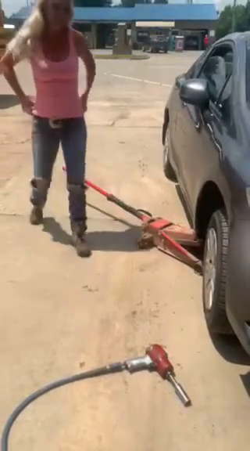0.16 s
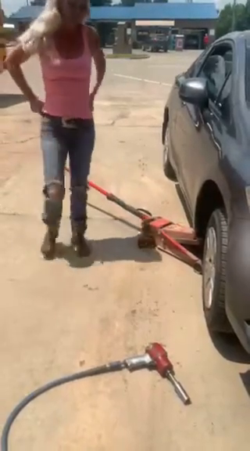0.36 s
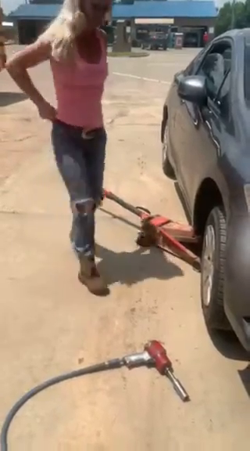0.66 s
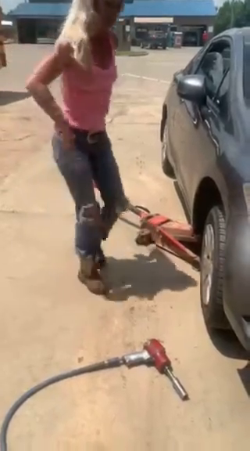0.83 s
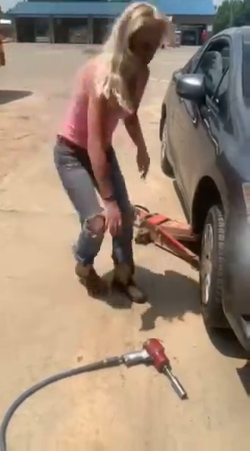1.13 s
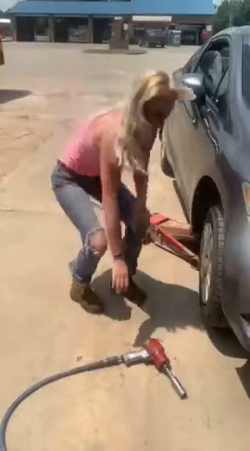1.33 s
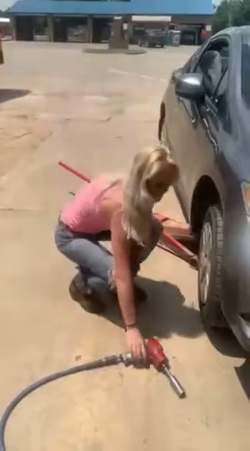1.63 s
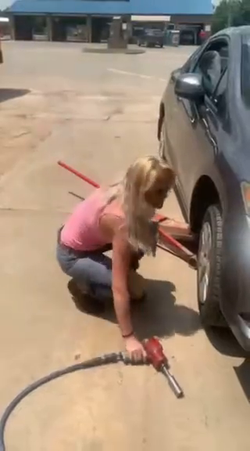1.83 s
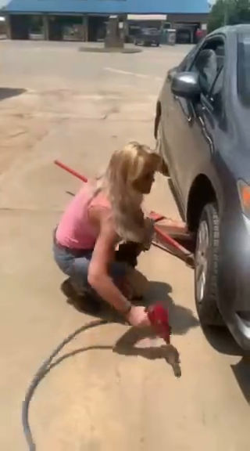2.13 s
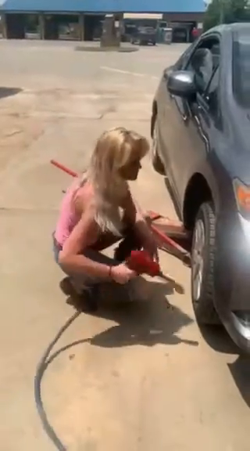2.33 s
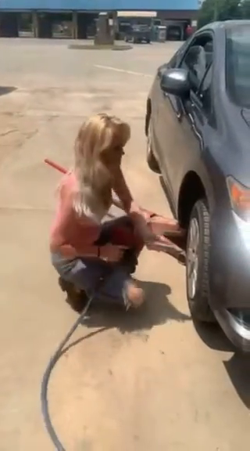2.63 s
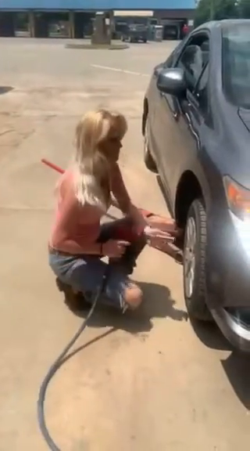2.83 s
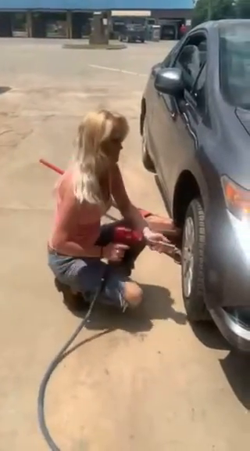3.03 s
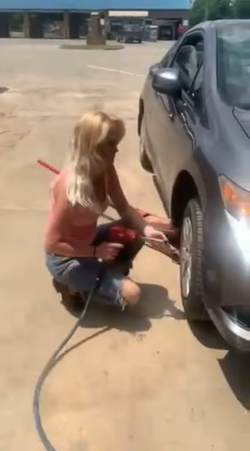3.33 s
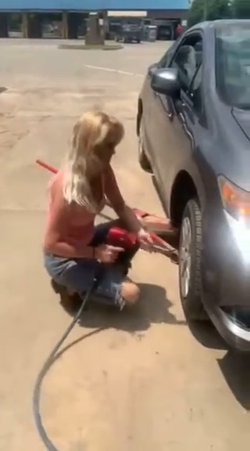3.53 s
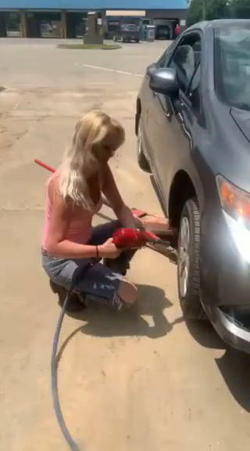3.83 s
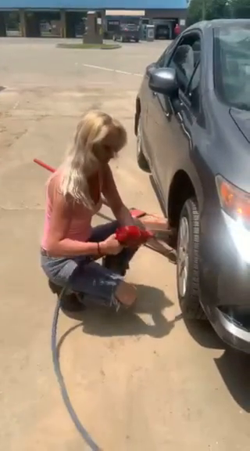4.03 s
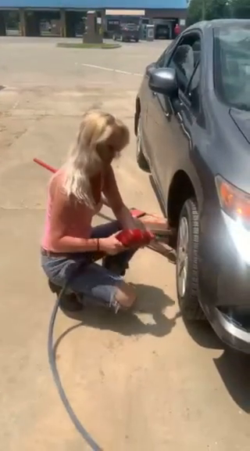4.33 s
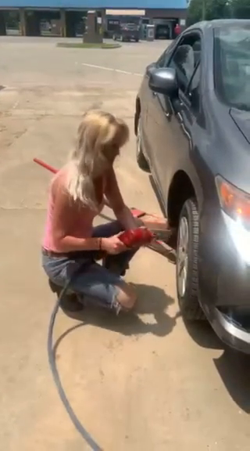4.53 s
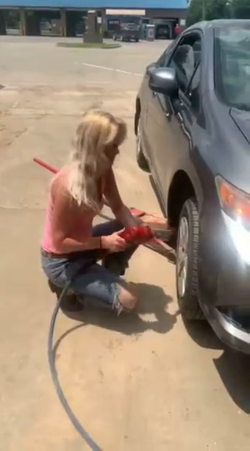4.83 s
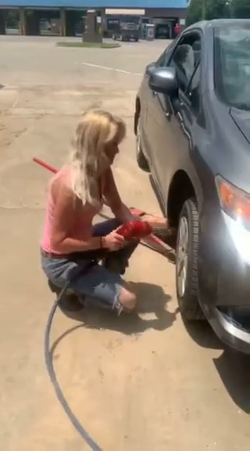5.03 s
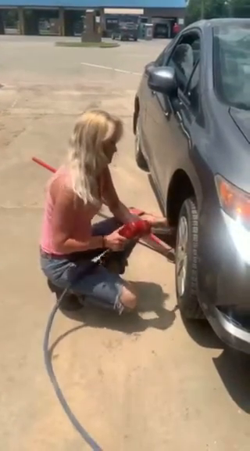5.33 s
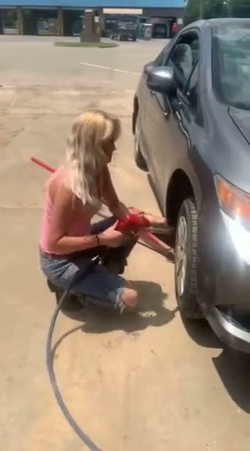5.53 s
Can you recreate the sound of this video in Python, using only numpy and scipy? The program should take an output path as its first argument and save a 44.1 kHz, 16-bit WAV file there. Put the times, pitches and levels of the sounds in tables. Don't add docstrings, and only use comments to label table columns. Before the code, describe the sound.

A low hum and distant rumble continue throughout. First come a footstep and gritty scuffs, then a scraping drag and sharp clack as a metal tool leaves the concrete. After a dull knock, a pneumatic wrench rattles up briefly with puffing exhaust and sharp air hiss, then coasts down. Faint settling sounds remain. Open lot with building echoes; an outdoor microphone whose level ducks under the loud burst.

```python
import sys
import numpy as np
from scipy import signal
from scipy.fft import rfft, irfft, next_fast_len
from scipy.io import wavfile

SR = 44100
rng = np.random.default_rng(int(sys.argv[2]) if len(sys.argv) > 2 else 0)


def master(y):
    cut = np.clip(np.atleast_2d(y).T, -1, 1)
    pcm = np.round(cut * 32767)
    wavfile.write(sys.argv[1], SR, pcm.astype(np.int16))


def volts_from_decibels(level):
    exponent = np.asarray(level, float) / 20
    return 10 ** exponent


N = 250038
SIZE = next_fast_len(N + SR)
HZ = np.maximum(np.arange(SIZE // 2 + 1) * SR / SIZE, 1)
T = np.arange(N) / SR


def in_time(rows):
    s, *columns = np.transpose(rows)
    return [np.interp(T, s, c) for c in columns]


def on_hz(points, axis=1):
    points = np.array(points)
    return np.interp(np.log(HZ), np.log(points[:, 0]), points[:, axis])


def rms_one(x):
    return x / np.sqrt(np.mean(x ** 2) + 1e-20)


def colour(x, spectrum):
    return rms_one(irfft(rfft(x, SIZE) * volts_from_decibels(on_hz(spectrum)), SIZE)[..., :N])


def white_pair():
    return rng.standard_normal((2, N))


def drift(rate_hz):
    knots = rng.standard_normal(int(N / SR * 60) + 2)
    return np.interp(T * rate_hz, np.arange(len(knots)), knots)


def resonate(x, hz, width_hz):
    r = np.exp(-np.pi * width_hz / SR)
    top = np.array([1, 0, -1]) * (1 - r * r) / 2
    return signal.lfilter(top, [1, -2 * r * np.cos(2 * np.pi * hz / SR), r * r], x, axis=-1)


def butter(x, order, hz, kind):
    return signal.sosfilt(signal.butter(order, hz, kind, fs=SR, output="sos"), x)


def band(x, low_hz, high_hz):
    return butter(x, 2, [low_hz, high_hz], "band")


# frequency in Hz, level in dB per Hz.
RUMBLE = [(15, -52.5), (28, -30.5), (50, -7), (70, -0.5), (100, -3.5), (150, -3), (220, -9.5), (300, -10),
          (380, -21), (520, -12), (640, -34), (900, -59.5)]
# frequency in Hz, level in dB per Hz.
TRAFFIC = [(300, 1.5), (600, -2.5), (1000, -1), (1600, -5), (2300, -5.5), (3200, -15.5), (5000, -10),
           (9000, -52.5), (12000, -60)]
# frequency in Hz, level in dB per Hz.
HISS = [(1500, -5.5), (3000, 6.5), (5000, 5), (8000, -2.5), (10500, -1.5), (11600, -10.5), (13500, -29)]
# time in seconds, level in dB.
LEAK = [(0, -57.5), (1.5, -61), (2.4, -60), (3.75, -58), (4.06, -60), (4.37, -70.5), (4.8, -76),
        (4.95, -71), (5.1, -72.5), (5.2, -87.5), (5.3, -74), (5.4, -73.5), (5.55, -71.5), (5.67, -62.5)]


def far_noise():
    thinned = np.clip((T - 4.245) / 0.46, 0, 1)
    traffic_db = -47 - 2.5 * thinned
    leak_db, = in_time(LEAK)
    rumble = colour(white_pair(), RUMBLE) * volts_from_decibels(-43 + 1.3 * drift(11))
    traffic = colour(white_pair(), TRAFFIC) * volts_from_decibels(traffic_db + 1.1 * drift(25))
    hiss = colour(white_pair(), HISS) * volts_from_decibels(leak_db + 9 + 1.5 * drift(40))
    return rumble + traffic + hiss


# tone in Hz, level in dB rms, waver in dB.
HUM = [(71.5, -50, 2), (120.5, -36.5, -0.02), (144, -50.5, 0), (180, -50.5, 2.5)]


def hum():
    whine_hz, whine_width_hz, whine_db = 425.5, 10, -51.5
    breath = resonate(rng.standard_normal(N), whine_hz, whine_width_hz)
    out = volts_from_decibels(whine_db) * rms_one(resonate(breath, whine_hz, 2 * whine_width_hz))
    for hz, db, waver_db in HUM:
        level = np.sqrt(2) * volts_from_decibels(db + waver_db * drift(10))
        phase = 1.12 * waver_db * drift(8.2) + 6 * rng.random()
        out = out + level * np.sin(2 * np.pi * hz * T + phase)
    return out


# delay in seconds, level in dB.
ECHOES = [(.009, -12), (.022, -24), (.074, -17.5), (.135, -27.5)]


def lot(x):
    tail_db, t60_s, cut_hz = -50, 0.97, 2100
    t = np.arange(SR) / SR
    tail = rng.standard_normal((2, SR)) * volts_from_decibels(tail_db - 60 * t / t60_s) * np.clip((t - .03) / 0.2, 0, 1)
    for delay_s, db in ECHOES:
        tail[:, round(delay_s * SR)] += volts_from_decibels(db)
    dull = 1 / (1 + 1j * HZ / cut_hz) / (1 + 300 / (1j * HZ)) ** 2
    return irfft(rfft(x, SIZE) * rfft(tail, SIZE) * dull, SIZE)[:, :N]


def shuffle():
    at_s, length_s, level_db = 3.54, 0.11, -45
    swell = np.exp(-.5 * ((T - at_s) / length_s) ** 2)
    return volts_from_decibels(level_db + 3.6 * drift(40)) * swell * rms_one(band(rng.standard_normal(N), 150, 420))


# start in seconds, hardest contact in seconds, end in seconds, level in dB, brightness in dB.
DRAGS = [
    (0.542, 0.565, 0.58, -55.5, 16),
    (1.243, 1.262, 1.275, -45, 3),
    (1.424, 1.444, 1.44, -43, -8),
    (1.864, 2.017, 2.16, -37.5, -2),
    (2.051, 2.049, 2.034, -19.5, 1.5),
    (2.285, 2.32, 2.7, -52, 9),
    (2.37, 2.392, 2.4, -36, -13.5),
    (3.927, 4.02, 2.9, -62, -13),
]


def drags(per_s=900):
    edge_db = -18
    size = volts_from_decibels(3.2 * np.minimum(rng.exponential(1, N), 4)) * rng.choice([-1, 1], N)
    grit = (rng.random(N) < per_s / SR) * size
    grit = rms_one(grit) * volts_from_decibels(2.5 * drift(59)) + .6 * rng.standard_normal(N)
    body, scratch = rms_one(band(grit, 714, 2700)), rms_one(band(grit, 2400, 8800))
    out = np.zeros(N)
    for start_s, hardest_s, end_s, level_db, bright_db in DRAGS:
        db = level_db + np.interp(T, [start_s, hardest_s, end_s], [edge_db, 0, edge_db])
        on = np.clip(np.minimum(T - start_s, end_s - T) / 0.0098, 0, 1)
        out += on * volts_from_decibels(db) * (body + volts_from_decibels(bright_db) * scratch)
    return out


# time in seconds, peak in dB, pitch in Hz, t60 in seconds.
THUDS = [(1.107, -32, 144, 0.076), (1.2455, -14.5, 327, 0.083), (1.2463, -28.5, 1030, 0.027),
         (1.254, -35.5, 1110, .015), (2.063, -33, 158, 0.016), (2.336, -30.5, 390, 0.048),
         (2.392, -22, 264, 0.048), (3.0089, -16.5, 177, 0.069), (3.029, -11.5, 176.6, 0.21),
         (3.472, -34, 1400, .03), (3.5653, -28, 865, 0.023)]


def thuds():
    out = np.zeros(N)
    for s, db, hz, t60_s in THUDS:
        t = T - s - .001
        heel = 0.81 * np.exp(-.5 * (t / 0.000076) ** 2)
        sole = np.exp(-.5 * ((t - .9 / hz) / 0.0003) ** 2)
        push = heel - sole + 1e-18
        knock = resonate(push, hz, 2.9 / t60_s)
        knock -= .5 * resonate(push, 0.48 * hz, 3.4 / t60_s)
        knock -= .5 * resonate(push, 1.5 * hz, 2.5 / t60_s)
        knock += 0.52 * resonate(push, 3.3 * hz, 3.0 / t60_s)
        out += volts_from_decibels(db) * knock / np.abs(knock).max()
    return out


# time in seconds, exhaust puffs per s, puff level in dB.
MOTOR = [
    (3.0105, 27, -34),
    (3.033, 62, -25.5),
    (3.058, 107, -27),
    (3.087, 149, -30.5),
    (3.12, 156, -27),
    (3.145, 248, -19.5),
    (3.172, 380, -17.5),
    (3.205, 443, -19.5),
    (3.246, 490, -17),
]
# time in seconds, peak in dB, t60 in seconds, ring in Hz.
TICKS = [(0.56, -45, 0.023, 7040), (1.2745, -33, 0.07, 6800), (1.454, -39.5, 0.071, 6600),
         (1.479, -40, 0.025, 3260), (2.0575, -26, .012, 10600), (2.0579, -21, 0.0089, 7900),
         (2.0657, -34, 0.015, 6950), (2.311, -42, 0.06, 6380), (2.3825, -26, 0.015, 5550),
         (2.3894, -36, 0.045, 6800), (2.8996, -28, 0.025, 6260), (3.0098, -6.5, 0.02, 5910),
         (3.026, -16, 0.023, 2150), (3.0322, -6.5, .02, 6800), (3.0445, -9, .014, 6800),
         (3.0558, -4, .012, 10500), (3.081, -15, .01, 6200), (3.0935, -12.5, 0.05, 11050),
         (3.0967, -12.5, 0.016, 7560), (3.1135, -14, .01, 6000), (3.1198, -13, .008, 6130),
         (3.135, -7.5, 0.02, 6700), (3.2368, -16, 0.06, 5000), (5.552, -50, .04, 11700),
         (5.663, -42, 0.04, 5600)]
# time in seconds, peak in dB, body in relative dB, ring in Hz.
SNAPS = [(0.0397, -40.5, 5.5, 7200), (0.5465, -38, 0, 9700), (1.2465, -43.5, 10, 5240),
         (1.276, -46, 8, 3300), (1.439, -50, 12, 1400), (1.447, -48, 8, 3000), (1.456, -49, 12, 1500),
         (1.48, -41, 6, 1500), (1.945, -48, 10, 1900), (1.975, -46, 10, 1800), (2.004, -46, 10, 1600),
         (2.018, -44, 10, 2000), (2.032, -48, 10.5, 1990), (2.04, -31.5, -8, 7330), (2.071, -45, -1, 7000),
         (2.081, -33.5, 5, 7400), (2.5395, -43, -4, 5780), (2.678, -55, -6, 3007), (2.7052, -47, -8, 3360),
         (3.5044, -38.5, 7, 9800), (3.5412, -41, 3, 6560), (3.593, -42, -6, 6500),
         (3.5672, -42.5, -11, 3710), (3.7637, -47, 2, 5940), (3.812, -40, 0.5, 5840),
         (3.95, -37, -5, 10550), (3.96, -38.5, -8, 10300), (4.013, -43.5, -18, 6740), (4.682, -50, 8, 3100),
         (4.8194, -53.5, 0.5, 3060), (4.8883, -47.5, -4, 5570)]


def ticks():
    body_db, running_body_db = -16, -22
    snap_t60_s, crack_db, crack_t60_s, rise_s = 0.028, 7, 0.0099, 0.0019
    alike, held_alike, held_s = 0.05, .95, (3.07, 3.2)
    rows = []
    for s, db, t60_s, hz in TICKS:
        running = MOTOR[1][0] < s + .005 < MOTOR[-1][0]
        rows.append((s, db, running_body_db if running else body_db, t60_s, hz))
    rows += [(s, db, low_db, snap_t60_s, hz) for s, db, low_db, hz in SNAPS]
    t = np.arange(SR // 6) / SR
    late = np.maximum(t - rise_s, 0)
    out = np.zeros((2, N))
    for s, db, low_db, t60_s, hz in rows:
        same = held_alike if held_s[0] < s < held_s[1] else alike
        white = rng.standard_normal((2, len(t)))
        white[1] = same * white[0] + np.sqrt(1 - same ** 2) * white[1]
        snap = 0.29 * band(white, 3300, 4800) + 6.1 * resonate(white, hz, 840)
        snap = snap + volts_from_decibels(low_db + 9) * band(white, 890, 4200)
        snap = snap + volts_from_decibels(crack_db - 60 * late / crack_t60_s) * band(white, 4500, 12500)
        shape = volts_from_decibels(-60 * late / max(t60_s, .005)) * np.minimum(t / rise_s, 1) ** 2
        at = round(s * SR)
        out[:, at:at + len(t)] += (volts_from_decibels(db - 5.5) * shape * snap)[:, :N - at]
    return out


def rotor():
    valve_s, coast_s = 0.0023, 0.2
    driven, puff_db = in_time(MOTOR)
    since, after = T - MOTOR[0][0], np.maximum(T - MOTOR[-1][0], 0)
    shut, slowed = np.clip(after / valve_s, 0, 1), np.exp(-after / coast_s)
    slowed_db = 20 * np.log10(slowed)
    puff_db = puff_db - 7.5 * shut + 2.1 * slowed_db
    sag_db = 9 * (since - after)
    opening_db = -8.1 * np.clip(1 - since / 0.035, 0, 1)
    jet_db = -17 - sag_db + opening_db - 18 * shut + 0.81 * slowed_db
    uneven = np.clip(np.minimum((driven - 28) / 40, (MOTOR[-1][1] - driven) / 163.5), 0, 1)
    rough = 0.3 * uneven + shut * (0.16 + 0.75 * (1 - slowed))
    boom_hz, boom_octaves, coast_boom_db = 147.3, 0.75, -14
    boom_db = -6.5 + 18 * np.exp(-(np.log2(driven / boom_hz) / boom_octaves) ** 2)
    return driven * slowed, puff_db, jet_db, rough, boom_db + shut * (coast_boom_db - boom_db)


# frequency in Hz, width in Hz, level in dB, share of low boom.
EXHAUST = [(123, 120, -6, 1.3), (256, 59, 11, 1.05), (495, 57, 8, 0.0096), (688, 95, 7.5, 0.37),
           (894, 209, 11, 0.42), (1406, 130, 0, -0.6), (1652, 330, 4, 0.12)]
# frequency in Hz, level in dB per Hz.
JET = [(300, -12), (1000, -13), (2500, -12.5), (3500, -5), (4600, -6.5), (5600, -6), (6800, -4), (8000, -8),
       (9000, 5), (10500, -6), (11500, -14), (14000, -12.5)]


def vane_motor(gate_s=0.0028, steady=0.27, uneven_db=4.0):
    stop_s, muffler_hz, notch_hz, whirr_db = 3.69, 2100, 635, -46.5
    start_s, release_s = MOTOR[0][0], MOTOR[-1][0]
    per_s, puff_db, jet_db, rough, boom_db = rotor()
    on = (T >= start_s) & (T < stop_s)
    turns = np.cumsum(per_s * on) / SR + .999
    vents = np.diff(np.floor(turns), prepend=0) * on
    vents = vents * volts_from_decibels(uneven_db * rough * rng.standard_normal(N)) + 1e-18
    r = np.exp(-1 / (gate_s * SR))
    gate = signal.lfilter([1 - r], [1, -r], vents * SR / per_s)
    gate = signal.lfilter([1 - r], [1, -r], gate)
    gate = gate / np.sqrt(1 + 1 / (4 * gate_s * per_s)) + steady * np.clip((T - start_s) / 0.014, 0, 1)
    drive = vents * np.sqrt(SR / per_s)
    drive = drive + rough * gate * on * rng.standard_normal(N)
    puffs = np.zeros(N)
    for k, (hz, width_hz, db, low) in enumerate(EXHAUST):
        puffs += (-1) ** k * volts_from_decibels(db + low * boom_db) * resonate(drive, hz, width_hz)
    puffs = butter(puffs - .9 * resonate(puffs, notch_hz, 150), 6, muffler_hz, "low")
    puffs = butter(puffs, 2, 95, "high")
    puffs = puffs / np.sqrt(np.mean(puffs[on] ** 2))
    jet = colour(white_pair(), JET) * gate * volts_from_decibels(jet_db + 0.33 * drift(57)) * on
    whirr = rms_one(band(jet[0] / volts_from_decibels(jet_db), 1800, 4700)) * (T > release_s)
    whirr = whirr * volts_from_decibels(whirr_db + puff_db - puff_db[round(3.27 * SR)])
    return puffs * volts_from_decibels(puff_db) + whirr, jet


# frequency in Hz, width
# in Hz, share of the unrelated draw removed, end in seconds.
ALIKE_BANDS = [
    (4650, 1800, .8, 3.21),
    (8900, 1600, .6, 3.16),
]


def more_alike(jet):
    left, right = jet
    lost = sum(share * (T < until_s) * resonate(right, hz, width_hz) for hz, width_hz, share, until_s in ALIKE_BANDS)
    return np.array([left, right - lost])


# frequency in Hz, right lead in radians, left minus right in dB, likeness of far sound.
PORTS = [(30, 0, 1.2, .98), (130, .05, 3.5, .99), (350, .5, 8, .75), (700, 1.0, 3, .55),
         (1300, .3, 1.2, .7), (2000, -.1, .3, .75), (2900, -1.9, 0, .4), (4100, -2.9, 0, .77),
         (5400, -3.4, 0, .77), (6000, -6.0, 0, .76), (7600, -6.6, 0, .76), (8250, -9.1, 0, .69),
         (9600, -9.7, 0, .69), (10300, -12.3, 0, .84), (14000, -12.8, -14, .9)]


def ports(near, far, near_tilt=0.28):
    alike = on_hz(PORTS, axis=3)
    tilt = volts_from_decibels(on_hz(PORTS, axis=2) / 2)
    hz, lead_rad = np.transpose(PORTS)[:2]
    lead = np.interp(HZ, hz, lead_rad)
    near, (a, b) = rfft(near, SIZE), rfft(far, SIZE)
    far_right = alike * a + np.sqrt(1 - alike ** 2) * b
    left = near[0] * tilt ** near_tilt + a * tilt
    right = (near[1] / tilt ** near_tilt + far_right / tilt) * np.exp(1j * lead)
    return irfft(np.array([left, right]), SIZE)[:, :N]


def gain_db():
    duck_at_s, duck_db, duck_s = 3.0, -21, .07
    free_at_s, recover_s, settle_db = 3.34, .085, -3
    down = duck_db * (1 - np.exp(-np.maximum(T - duck_at_s, 0) / duck_s))
    recovered = 1 - np.exp(-(np.maximum(T - free_at_s, 0) / recover_s) ** 1.3)
    return down + (settle_db - down) * recovered


def scene():
    unduck = volts_from_decibels(-gain_db())
    puffs, jet = vane_motor()
    jet = more_alike(jet * unduck)
    near = (puffs + ticks() + thuds() + drags() + shuffle()) * unduck + .2 * jet[0]
    scatter = 0.85 + 0.48 * np.exp(-(np.maximum(T - MOTOR[0][0], 0) / 0.042) ** 2)
    near = near + scatter * np.array([jet[1], -jet[1]])
    return ports(near, hum() * [[1], [0]] + jet + far_noise() + lot(near[0]))


def roll_off(x):
    return signal.sosfilt(signal.butter(12, 13440, fs=SR, output="sos"), x)


def record(dry):
    top_hz, limit = 11800, .95
    ducked = limit * np.tanh(dry * volts_from_decibels(gain_db()) / limit)
    cut = signal.sosfilt(signal.cheby1(13, .5, top_hz, fs=SR, output="sos"), ducked)
    return roll_off(cut)


dry = scene()
out = record(dry)
master(out)
```